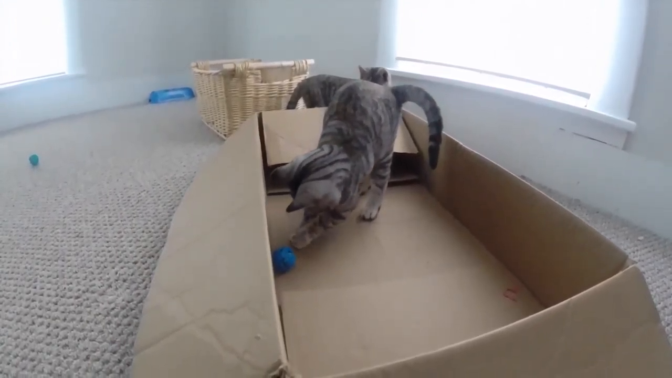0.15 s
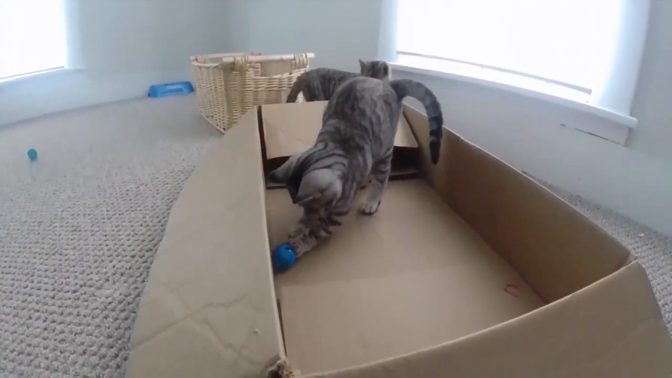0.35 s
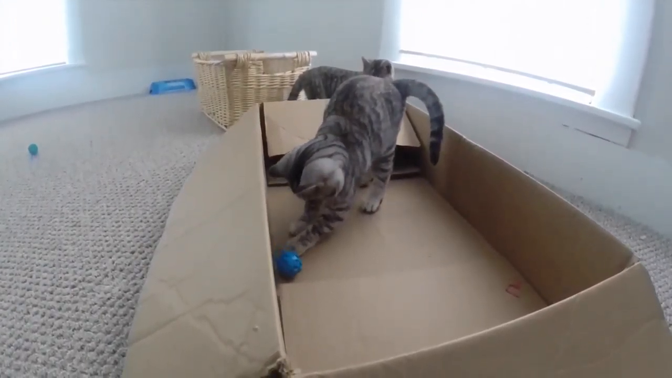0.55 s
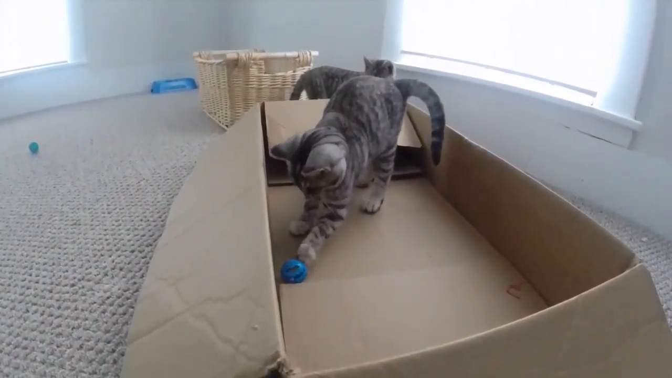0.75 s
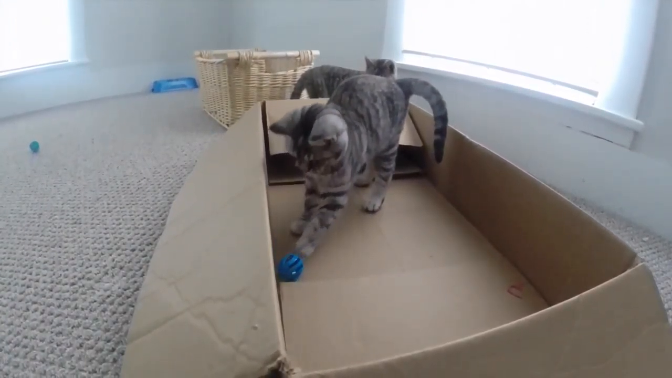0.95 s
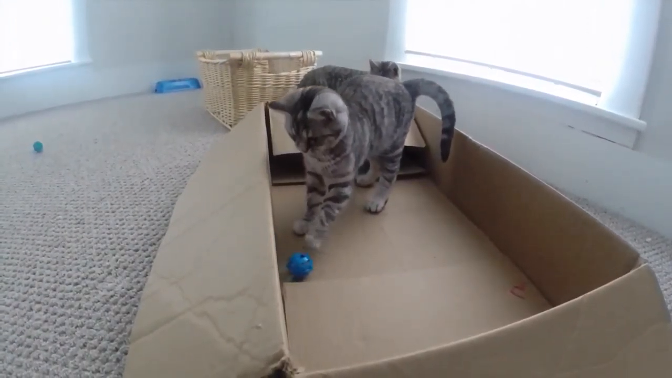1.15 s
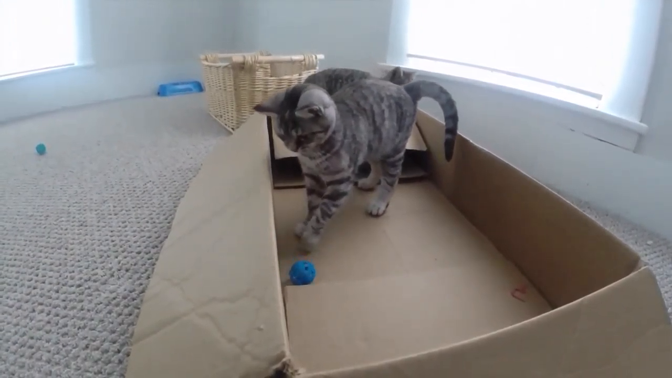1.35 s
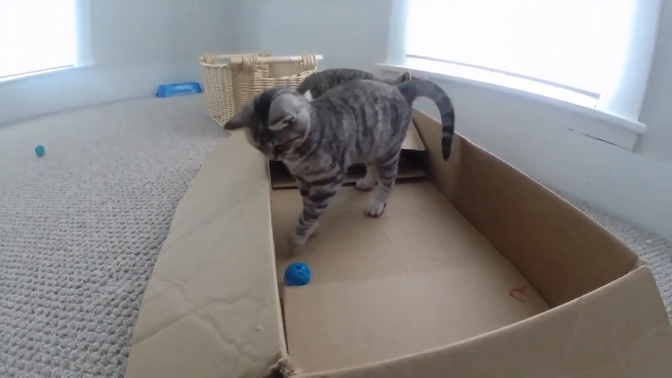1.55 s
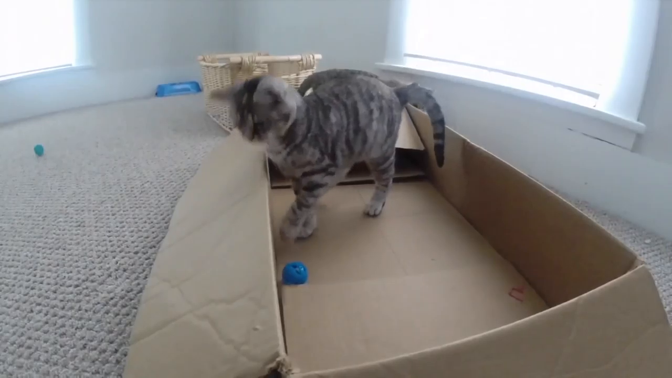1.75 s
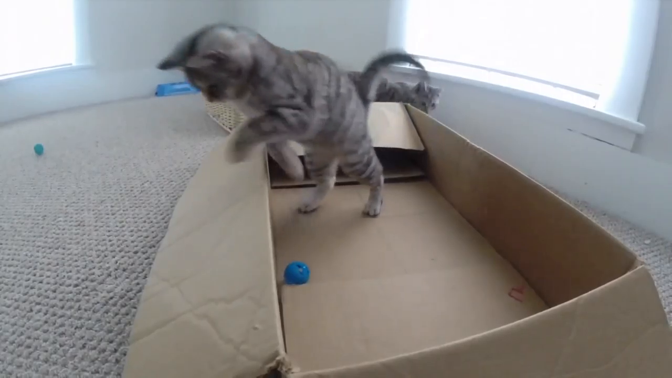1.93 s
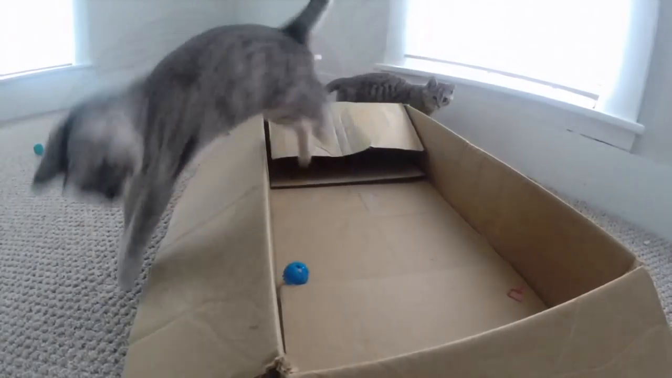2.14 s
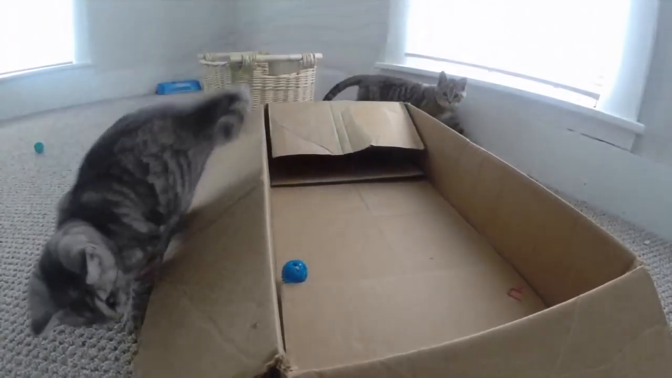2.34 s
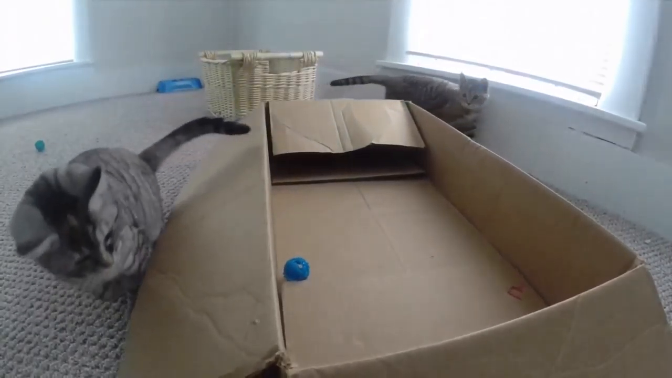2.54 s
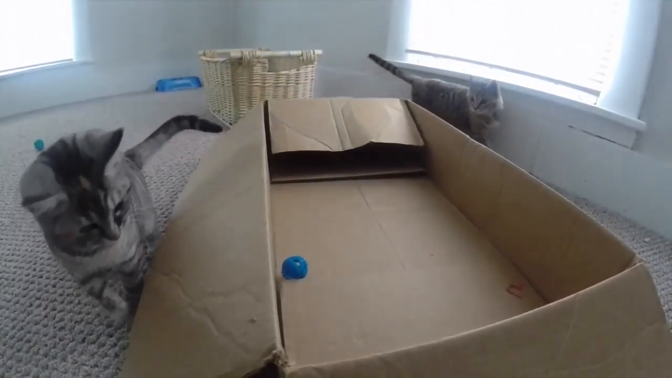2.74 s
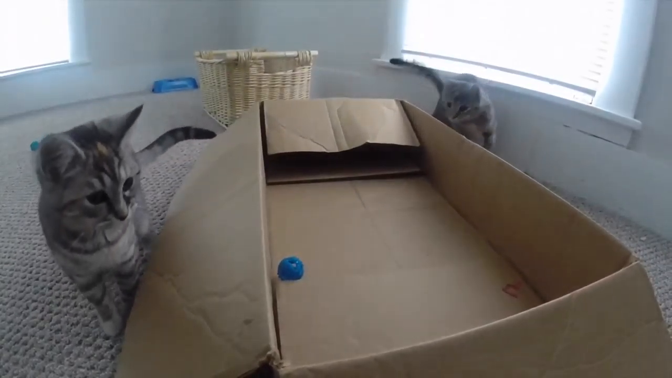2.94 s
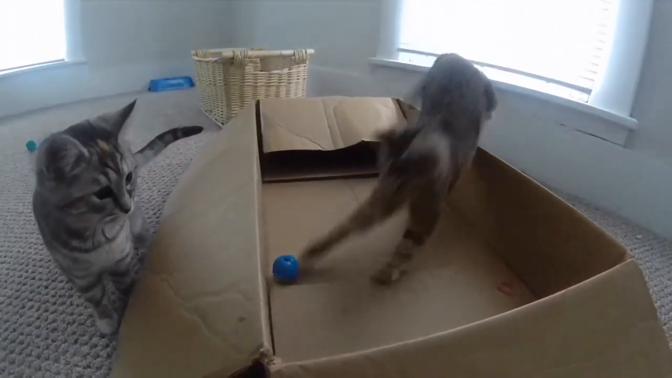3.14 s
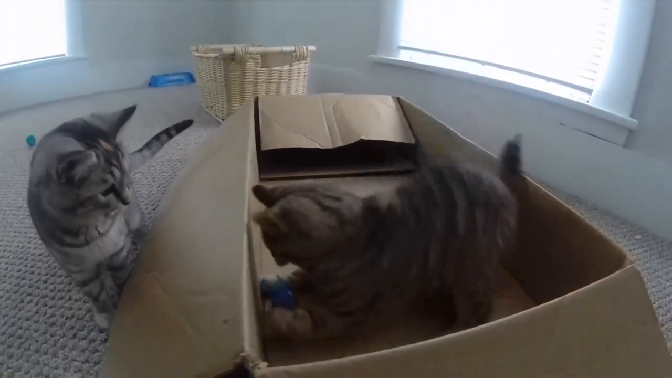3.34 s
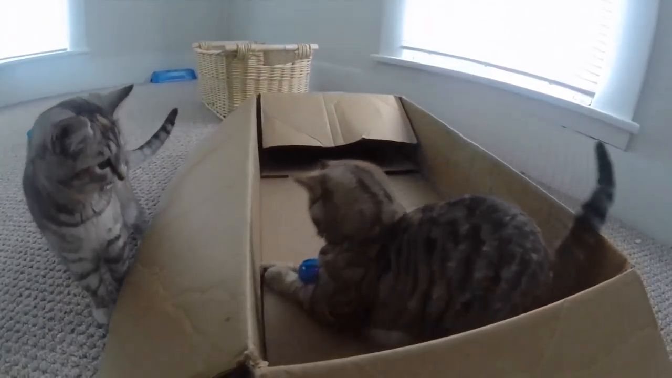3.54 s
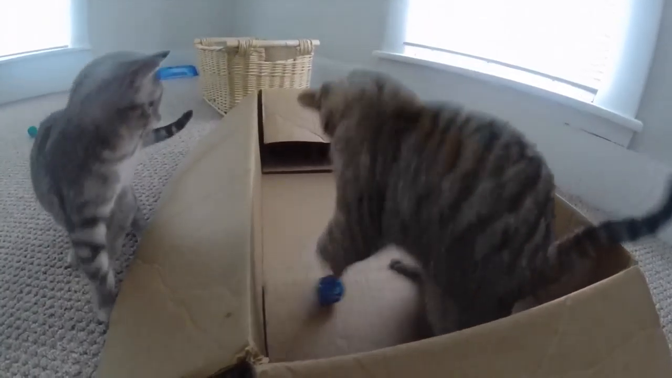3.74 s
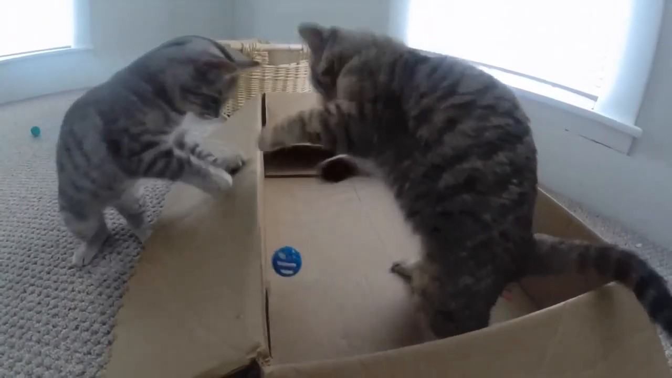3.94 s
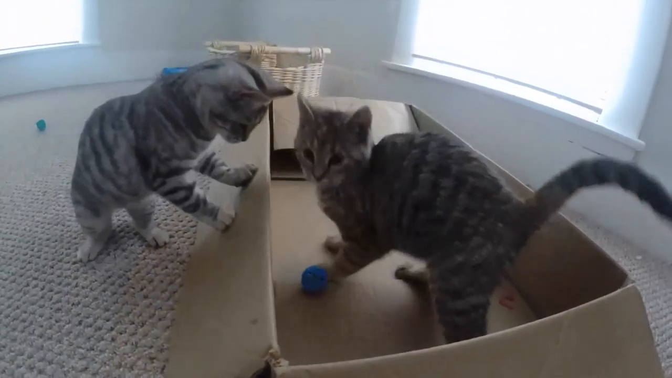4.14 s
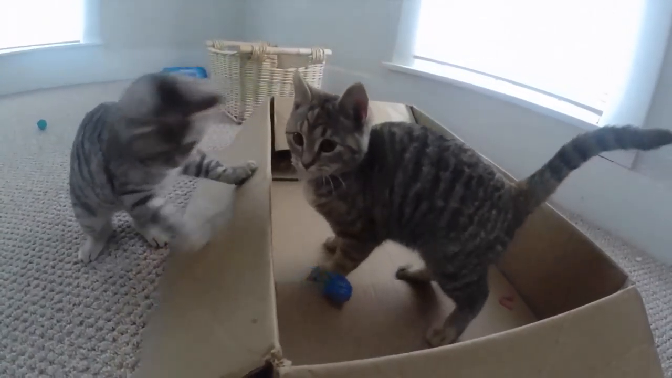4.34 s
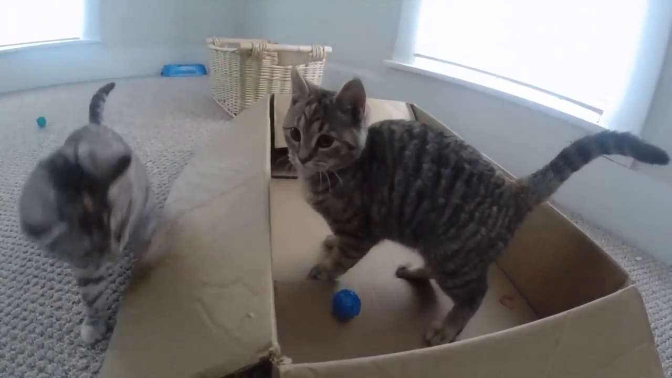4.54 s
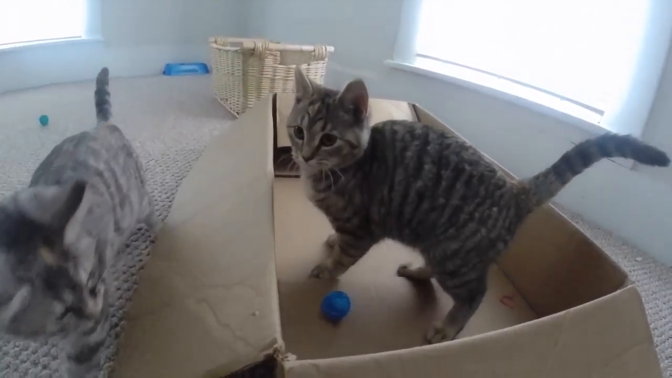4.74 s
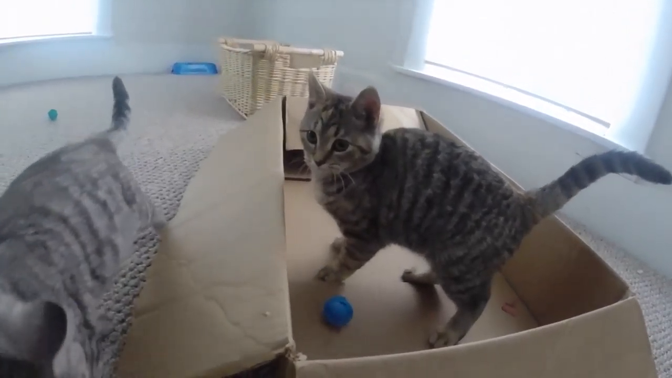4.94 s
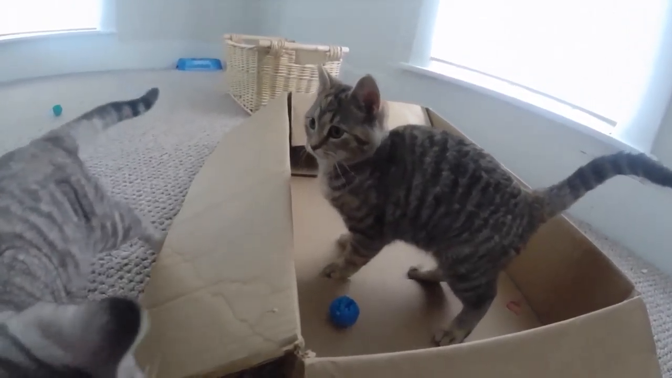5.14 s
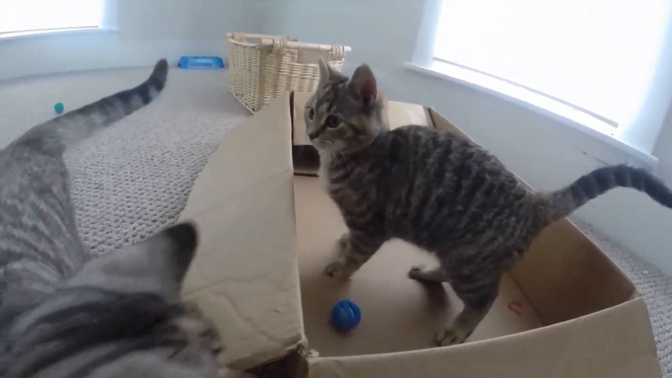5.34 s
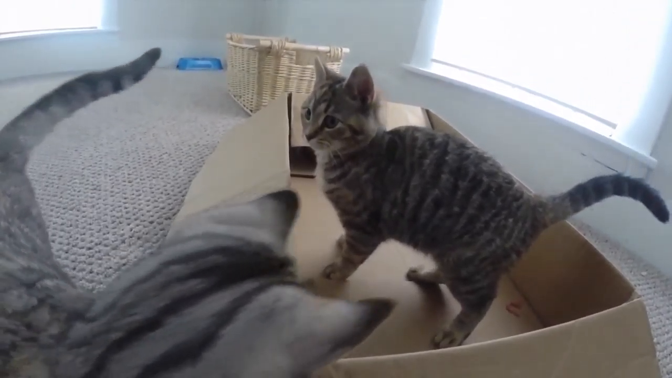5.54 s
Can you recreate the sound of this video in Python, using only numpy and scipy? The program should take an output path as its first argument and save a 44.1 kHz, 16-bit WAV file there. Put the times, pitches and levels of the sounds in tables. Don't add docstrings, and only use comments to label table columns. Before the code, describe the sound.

Light cardboard taps and faint bell tinkles, then a burst of hollow thumps, claw ticks and scrapes that settles into small clicks.

```python
import sys
import numpy as np
from scipy import signal
from scipy.fft import rfft, irfft, next_fast_len
from scipy.io import wavfile
from scipy.ndimage import uniform_filter1d, map_coordinates

SR = 44100
rng = np.random.default_rng(int(sys.argv[2]) if len(sys.argv) > 2 else 0)


def boost(x):
    u = np.asarray(x, float) / 20
    return 10 ** u


def master(y):
    cut = np.clip(np.atleast_2d(y).T, -1, 1)
    pcm = np.round(cut * 32767)
    wavfile.write(sys.argv[1], SR, pcm.astype(np.int16))


N = 250473


def unit(x):
    return x / np.sqrt(np.mean(x ** 2) + 1e-20)


def along(points, hz):
    f, v = np.transpose(points)
    return np.interp(np.log(hz + 1), np.log(f + 1), v)


def filtered(x, response):
    m = next_fast_len(len(x) + 8192)
    return irfft(rfft(x, m) * response(np.fft.rfftfreq(m, 1 / SR)), m)[:len(x)]


def resonances(modes):
    def response(f):
        total = 0
        for k, (centre, width, db) in enumerate(modes):
            damping = 1j * f * width
            total = total + (-1) ** k * boost(db) * damping / (centre * centre - f * f + damping)
        return total
    return response


def wobble(rate):
    at = np.arange(0, N + 32, 32)
    knots = rng.standard_normal(int(N * rate / SR) + 4)
    return np.interp(np.arange(N), at, map_coordinates(knots, [at * rate / SR]))


def ring(hz, db, t60, t, rise):
    return boost(db - 60 * t / t60) * np.sin(2 * np.pi * hz * t) * (1 - np.exp(-t / rise))


def burst(db, t60, t):
    fade = boost(-60 * t / t60)
    return boost(db) * unit(fade * rng.standard_normal(len(t))) * np.sqrt(np.mean(fade ** 2))


def add(track, s, sound):
    track[round(s * SR):][:len(sound)] += sound


# f/Hz, level/dB per Hz
AIR_SPECTRUM = [(15, -0.5), (35, -10), (65, 0), (91, -11), (300, -13.5), (2460, -26), (13500, -45.5),
                (15600, -60)]


def hush():
    noise = filtered(rng.standard_normal(N), lambda f: boost(along(AIR_SPECTRUM, f)))
    return boost(-57.5) * unit(noise)


def grit(per_s, spread_db, smooth):
    size = boost(spread_db * np.minimum(rng.exponential(size=N), 3)) * np.sign(rng.standard_normal(N))
    slips = (rng.random(N) < per_s / SR) * size
    return unit(unit(slips) + smooth * rng.standard_normal(N))


def patchy(x, spectrum, patchy_db):
    hz, _, z = signal.stft(x, SR, nperseg=256)
    field = uniform_filter1d(rng.standard_normal(z.shape), size=3, axis=0)
    field = uniform_filter1d(field, size=7, axis=1)
    gain = boost(along(spectrum, hz)[:, None] + patchy_db * unit(field))
    return unit(signal.istft(z * gain, SR, nperseg=256)[1][:N])


def strokes(rows, release_s, rest_db):
    attack_s, silent_db = 0.045, -100
    s, hold, db, over_db = np.transpose(rows)[:, :, None]
    t = np.arange(0, N / SR + .002, .001)
    gains = []
    for fall_s, extra_db, rest in zip(release_s, (0, over_db), rest_db):
        away = np.maximum(0, np.maximum((s - t) / attack_s, (t - s - hold) / fall_s))
        level = db - (db - silent_db) * away + extra_db
        gain = np.sqrt(np.sum(boost(level) ** 2, axis=0) + boost(rest) ** 2)
        gains.append(np.interp(np.arange(N) / SR, t, gain))
    return gains


# f/Hz, width/Hz, level/dB
PANEL_DRONE = [(126, 23, -0.5), (180, 52, -2.5), (250, 160, -8.5)]
PANEL_RATTLE = [(394, 23, -6), (510, 260, -4), (602, 270, -2.5), (697, 187, -8.5)]
# f/Hz, level/dB per Hz
PAD_SCRAPE = [(700, -3.5), (1000, 5.5), (2000, -0.5), (3300, -5.5), (4300, -15.5), (6000, -29)]
FUR_HISS = [(3000, -7), (4500, 1.5), (6000, -0.5), (8000, -6.5), (10000, -5.5), (13000, -14.5),
            (15400, -26)]
# t/s at full press, hold/s, drone level/dB, rattle level over drone/dB
WEIGHT_SHIFTS = [(.31, 0.2, -49.5, -9.5), (.485, 0.015, -43, -2.5), (.62, 0.37, -58.5, -11),
                 (.9, 0.021, -39, -2), (1.76, 0.48, -66, -5), (1.895, .01, -73, 7), (2.14, 0.013, -62, -15),
                 (2.28, 0.0046, -43.5, -10), (2.425, 0.0082, -42, -23), (3.222, 0.0067, -17, -35),
                 (3.32, 0.0088, -34.5, -1), (3.44, 0.029, -51, 14), (3.58, 0.06, -67.5, 18),
                 (3.7, 0.45, -56.5, 10), (3.985, 0.013, -32.5, 3.5), (4.09, 0.026, -39.5, 3),
                 (4.155, 0.0058, -30, -10), (4.3, 0.18, -57, -8), (4.56, 0.19, -58.5, -10),
                 (5.0, 0.091, -57, -18)]
# t/s at full speed, hold/s, scrape level/dB, fur hiss level over scrape/dB
PAD_SLIDES = [(.31, 0.056, -61.5, -16), (.365, 0.019, -56, -17), (.475, 0.043, -49.5, -16),
              (.62, 0.36, -67, -12), (.892, 0.008, -45.5, -37), (.915, 0.05, -59, -24),
              (1.73, .008, -76, 0), (1.888, 0.0095, -63, -4.5), (1.97, 0.006, -67.5, -5),
              (2.125, 0.018, -65, -3.5), (2.272, 0.0054, -61.5, -7), (2.41, 0.015, -66, -1),
              (3.222, 0.057, -42, -9), (3.26, 0.072, -38.5, -7.5), (3.36, 0.1, -44.5, -4.5),
              (3.44, 0.075, -42.5, -7), (3.55, 0.067, -49, -6.5), (3.635, 0.24, -50.5, -7.5),
              (3.865, 0.087, -47, -3), (3.965, 0.099, -48.5, -4), (4.098, 0.026, -38.5, -7.5),
              (4.165, 0.11, -54, -0.5), (4.28, 0.012, -50, -9), (4.345, 0.028, -58.5, 0),
              (4.495, 0.013, -61, 0), (4.56, 0.16, -65.5, -4), (4.99, 0.1, -68.5, -10)]
# level/dB of drone, rattle, scrape, fur
RESTLESS_DB = (-67, -84, -75, -79.5)


def scuffle():
    drone_gain, rattle_gain = strokes(WEIGHT_SHIFTS, release_s=(.32, .3), rest_db=RESTLESS_DB[:2])
    scrape_gain, fur_gain = strokes(PAD_SLIDES, release_s=(.33, .17), rest_db=RESTLESS_DB[2:])
    drone = filtered(grit(per_s=320, spread_db=19.0, smooth=3.7), resonances(PANEL_DRONE))
    drone = filtered(drone, resonances([(180, 155, 0)]))
    rattle = filtered(grit(per_s=330, spread_db=2, smooth=0.4), resonances(PANEL_RATTLE))
    rattle = filtered(rattle, resonances([(533, 1500, 0)]))
    scrape = patchy(grit(per_s=900, spread_db=4.5, smooth=.9), PAD_SCRAPE, patchy_db=1.8)
    fur = patchy(grit(per_s=800, spread_db=1.5, smooth=1.3), FUR_HISS, patchy_db=1.6)
    uneven = boost(1.2 * wobble(60))
    pressing = drone_gain * unit(drone) + rattle_gain * unit(rattle)
    return pressing + uneven * (scrape_gain * scrape + boost(2.5) * fur_gain * fur)


# t/s, f/Hz, peak level/dB, t60/s
PAD_LANDINGS = [(0.2955, 417, -58, 0.025), (0.713, 476, -36, 0.02), (2.2655, 160, -20, 0.036),
                (2.303, 152, -33, 0.043), (2.416, 548, -49, 0.15), (2.4462, 154, -34.5, 0.11),
                (2.49, 550, -48, .05), (2.9345, 330, -26.5, 0.029), (2.946, 230, -39, 0.044),
                (2.959, 305, -32.5, 0.024), (2.979, 220, -40, .04), (3.208, 424, -27, 0.036),
                (3.2425, 262, -17, 0.095), (3.2484, 194, -17.5, 0.077), (3.254, 543, -24, 0.022),
                (3.306, 382, -19.5, 0.051), (3.3535, 430, -22, 0.037), (3.356, 131, -17, 0.073),
                (3.411, 385, -8, 0.026), (3.4105, 218, -13, 0.12), (3.47, 199, -18, 0.072),
                (3.495, 212, -29, 0.034), (3.605, 483, -33.5, 0.026), (3.68, 484, -37.5, 0.037),
                (3.766, 200, -28, 0.05), (3.9558, 563, -8.5, 0.039), (3.9552, 272, -19.5, 0.1),
                (3.972, 554, -20.5, .09), (4.035, 250, -27, 0.13), (4.084, 172, -22, .05),
                (4.1, 568, -25.5, 0.091), (4.1475, 390, -17, 0.033), (4.1538, 237, -16, 0.043),
                (4.163, 123, -23.5, 0.1), (4.876, 300, -48, 0.028)]


def thumps():
    out, t = np.zeros(N + SR), np.arange(SR // 10) / SR
    for s, hz, db, t60 in PAD_LANDINGS:
        add(out, s, ring(hz, db + 1.5, t60, t, rise=0.32 / hz))
    return out[:N]


# f/Hz, level/dB, share of the blow's t60
BOARD_MODES = [(372, -16, 0.84), (405.3, -3.5, 0.88), (484.4, 5, 0.27), (591, -6, 0.57), (610, -13.5, 0.63),
               (676.4, -6.5, 0.71), (772, -3, 0.22), (995, -25.5, 1), (1546, 4, 0.069)]
# t/s, boom peak
# level/dB, boom f/Hz, knock level over boom/dB, struck spot's f/Hz
PANEL_BLOWS = [(0.297, -40, 191, 1.5, 415), (0.336, -42.5, 260, -4, 404), (0.376, -39, 173, -9, 594),
               (0.467, -37, 180, 3, 549), (0.568, -38.5, 203, -2.5, 443), (0.712, -57, 306, 22, 463),
               (0.8, -34, 150, 4, 460), (0.839, -40.5, 148, -1, 395), (0.885, -24, 186, 9.5, 526),
               (1.486, -48.5, 224, 6, 415), (1.883, -43, 156, 6, 550), (2.265, -34, 197, -1, 538),
               (2.299, -49, 144, -9, 355), (2.406, -33.5, 184, -10.5, 484),
               (2.419, -21, 148, -20.5, 533), (2.935, -44.5, 318, -1, 630),
               (2.963, -43.5, 250, 3, 355),
               (3.206, -24.5, 188, -2, 357), (3.218, -13, 179, -11, 353),
                       (3.243, -11.5, 183.4, 5, 510), (3.309, -23, 205, 6.5, 533),
                       (3.354, -25.5, 140, 13.5, 398), (3.381, -26.5, 191, 4.5, 488),
                       (3.407, -12, 192, 6, 416), (3.5, -26, 198, -3.5, 680),
                       (3.765, -28.5, 149.5, 3.5, 440), (3.797, -36, 176, 6.5, 477),
                       (3.85, -36, 233, 3, 587), (3.9556, -10.5, 188, 6.5, 379), (4.083, -39, 152, 7, 610),
                       (4.147, -46, 298, 23, 390), (4.153, -38, 237, 9.5, 377),
                       (4.256, -49, 203, 17.5, 526), (4.368, -38.5, 160, 4.5, 478),
                       (4.483, -47.5, 149, 10, 490), (4.581, -47, 214, 5.5, 525),
                       (4.624, -43, 225, 3.5, 407), (4.7, -50, 238, 11, 560), (4.876, -46, 191, -1, 456)]
# t/s, thud level/dB
FLOOR_THUDS = [(0.741, -41), (0.9, -52), (1.049, -41.5), (1.88, -38), (2.302, -26.5), (2.431, -23),
               (3.21, -28), (3.354, -26), (3.407, -60), (3.531, -35), (3.764, -31.5), (4.149, -16),
               (4.257, -34)]


def paws():
    panel, floor, t = np.zeros(N + SR), np.zeros(N + SR), np.arange(SR // 3) / SR
    for s, db, hz, over_db, spot_hz in PANEL_BLOWS:
        softness = min(over_db, 0)
        knock_db = db + over_db
        t60 = 0.086 * boost(-0.1 * softness)
        lasting = t60 * np.clip(2.05 + knock_db / 60, .4, 1.2)
        boom = ring(hz, db - 0.5, t60, t, 0.0005)
        boom += ring(hz * 1.34, db - 3 + 0.59 * softness, t60 * 1.06, t, 0.0027)
        boom += ring(hz * 0.774, db - 13.0, t60 * 1.3, t, 0.0051)
        add(panel, s, boom)
        for (f, level, share), (detune, luck) in zip(BOARD_MODES, rng.standard_normal((len(BOARD_MODES), 2))):
            mode_db = knock_db + level - 10.5 + 2 * luck
            add(panel, s, ring(f * (1 + 0.035 * detune), mode_db, lasting * share, t, 0.0006))
        add(panel, s, ring(spot_hz, knock_db, lasting * 0.34, t, 0.0022))
    for s, db in FLOOR_THUDS:
        add(floor, s, ring(62.0, db - 2.5, 0.15, t, 0.025) + ring(103.9, db - 11.0, 0.3, t, 0.018))
    high_pass = signal.butter(4, 130, "high", fs=SR, output="sos")
    return signal.sosfilt(high_pass, panel[:N]) + floor[:N]


# f/Hz, level/dB, t60/s
BELL_MODES = [
    [(4877, -1.5, .45)],
    [(4370, -.5, .4), (4477, -3, .3)],
    [(9470, 1, .35)],
    [(9706, -6, .17), (9860, -1, .15)],
    [(10553, -3, .25)],
]
# t/s, low
# pair level/dB, spot for the pair/degrees, overtones level/dB, spot for the overtones/degrees
PEA_STRIKES = [(0.312, -69, 9, -75, 170), (0.378, -51, 4, -85, 0), (0.468, -68, 4, -85, 0),
               (0.505, -55, 45, -65, 0), (0.527, -55, 40, -72, 50), (0.6, -61, 22, -84, 0),
               (0.69, -80, 30, -85, 0), (0.804, -64, 5, -77, 0), (0.836, -59, 30, -68, 35),
               (0.885, -66, 8, -71, 170), (0.927, -58, 25, -70, 0), (0.957, -60, 75, -59, 35),
               (0.968, -62, 50, -63, 145), (1.2, -68, 5, -90, 0), (4.407, -53, 38, -57, 85),
               (4.46, -67, 72, -80, 15), (4.573, -57, 5, -85, 0), (4.623, -58, 16, -68, 105),
               (4.649, -53, 24, -65, 80), (4.73, -62, 30, -76, 110), (4.935, -69, 4, -85, 0),
               (4.958, -60, 4, -88, 0), (4.995, -60, 4, -85, 10), (5.034, -69, 20, -85, 0),
               (5.074, -68, 5, -58, 8), (5.085, -76, 15, -65, 148),
               (3.244, -42, 20, -42, 120), (3.278, -42, 66, -45, 105), (3.327, -52, 51, -67, 60),
                  (3.39, -48, 22, -63, 42), (3.5, -48, 14, -58, 50), (3.533, -54, 3, -55, 112),
                  (3.578, -53, 10, -52, 108), (3.636, -54, 30, -71, 120), (3.694, -52, 30, -71, 120),
                  (3.794, -50, 48, -52, 90), (3.83, -48, 25, -58, 45), (3.865, -38, 24, -46, 102),
                  (3.9, -39, 27, -51, 130), (3.935, -41, 27, -53, 155), (3.956, -33, 12, -52, 123),
                  (4.004, -44, 20, -56, 100), (4.065, -82, 45, -85, 0), (4.092, -31, 7, -59, 10),
                  (4.124, -41, 75, -62, 165), (4.156, -41, 8, -62, 140), (4.19, -45, 35, -60, 140),
                  (4.221, -46, 36, -50, 85), (4.234, -47, 30, -51, 25), (4.27, -56, 80, -71, 60),
                  (4.297, -54, 45, -70, 65)]


def bell():
    t, out = np.arange(N) / SR, np.zeros(N)
    s, low_db, spot, high_db, high_spot = np.transpose(sorted(PEA_STRIKES))
    pair = [boost(low_db) * np.cos(np.radians(spot - 90 * k)) for k in range(2)]
    overtones = [boost(high_db) * np.cos(np.radians(high_spot - 60 * k)) ** 2 for k in range(3)]
    last = np.maximum(np.searchsorted(s, t) - 1, 0)
    age = t - s[last]
    for strength, group in zip(pair + overtones, BELL_MODES):
        for hz, db, t60 in group:
            luck = rng.random((len(s), 2))
            share_db = 6 * (len(group) - 1) * (luck[last, 0] - .5)
            size = (age > 0) * strength[last] * boost(db + share_db - 60 * np.abs(age) / t60)
            size = size * boost(2.2 * wobble(60))
            phase = np.cumsum(luck[:, 1])[last] + .8 * np.sqrt(hz / 4877) * wobble(45)
            swing = uniform_filter1d(size * [np.cos(phase), np.sin(phase)], size=120)
            out += swing[0] * np.sin(2 * np.pi * hz * t) + swing[1] * np.cos(2 * np.pi * hz * t)
    return out


# f/Hz, width/Hz, level/dB
BOARD_SKIN = [(980, 180, 2.5), (1520, 256, 7), (2130, 2100, 3.5), (3800, 2540, -2)]
# t/s, rap peak level/dB, tick peak
# level/dB
BOARD_CONTACTS = [(0.377, -47, -51), (0.489, -33.5, -66), (0.508, -36.5, -50), (0.5275, -55, -45),
                  (0.836, -44, -54), (0.8849, -26.5, -57), (1.002, -49, -66), (1.883, -45, -60),
                  (2.2662, -55, -53), (2.2768, -52, -46), (2.417, -53, -52),
                  (3.209, -31.5, -42), (3.218, -50, -31), (3.244, -14.5, -29), (3.3265, -44, -39),
                       (3.391, -42, -31.5), (3.406, -18.5, -38.5), (3.496, -61, -39), (3.576, -42, -78),
                       (3.601, -47, -46), (3.767, -25.5, -45), (3.7858, -28, -35), (3.7941, -31, -28.5),
                       (3.8502, -29.5, -51), (3.863, -48, -58), (3.87, -63, -36), (3.9231, -41, -31),
                       (3.9556, -12.5, -31.5), (3.96, -29, -23.5), (4.005, -31, -32), (4.084, -20.5, -24),
                       (4.123, -40, -42.5), (4.212, -39.5, -62), (4.2556, -44, -62.5), (4.301, -83, -46),
                       (4.4122, -39.5, -54), (4.483, -65, -63), (4.5702, -44, -42.5), (4.622, -47, -58.5),
                       (4.6998, -46.5, -56), (5.032, -53, -59)]
# t/s, peak level/dB
CLAW_SNAPS = [(3.2522, -41.5), (3.4218, -45), (3.4942, -30.5), (3.612, -52.5), (3.8693, -31.5),
              (3.9222, -39.5), (4.0035, -49.5), (4.0389, -41), (4.0679, -44.5), (4.0823, -43.5),
              (4.1222, -45), (4.22, -52.5), (4.232, -53.5)]


def claws():
    rap, tick, sizzle = np.zeros((3, N + SR))
    t = np.arange(SR // 20) / SR
    for s, rap_db, tick_db in BOARD_CONTACTS:
        add(rap, s, burst(rap_db + 6.5, 0.01, t))
        add(tick, s, burst(tick_db + 6.5, 0.004, t))
        add(sizzle, s, burst(tick_db - 15, .006, t))
    for s, db in CLAW_SNAPS:
        add(sizzle, s, burst(db + 2.5, 0.0082, t))

    def band(x, lo_hz, hi_hz):
        return signal.sosfilt(signal.butter(2, [lo_hz, hi_hz], "band", fs=SR, output="sos"), x[:N])
    return filtered(rap[:N], resonances(BOARD_SKIN)) + band(tick, 4500, 9000) + band(sizzle, 10500, 14200)


# t/s, f/Hz, peak level/dB, t60/s
NOTE_CLICKS = [(0.801, 2430, -38.5, 0.0094), (0.836, 1370, -38, 0.013), (0.923, 2260, -34, 0.012),
               (1.0017, 2350, -41, 0.016), (1.972, 1900, -44, 0.011), (2.145, 3080, -49, 0.011),
               (0.8852, 686.4, -31, 0.16), (3.268, 7100, -25, .005), (3.282, 3800, -24, .006),
               (3.391, 5500, -33, .005), (3.4085, 629, -6, 0.025), (3.409, 1520, -9, 0.013),
               (3.7938, 4980, -14.5, 0.0046), (3.863, 5800, -35, .006), (3.87, 5600, -38, .007),
               (3.9235, 6000, -36, .007), (3.9558, 513, -21, 0.04), (4.083, 765, -17, 0.023),
               (4.106, 5600, -24, .005), (4.005, 6000, -31, .007), (4.084, 2740, -12, 0.0045),
               (4.084, 3850, -10, 0.0033), (4.2117, 4840, -24.5, 0.0042), (4.2567, 1800, -34, 0.014),
               (4.279, 1710, -30.5, 0.01), (4.283, 1900, -37, 0.02), (4.294, 3250, -37, 0.029),
               (4.446, 1250, -49, .02), (4.4833, 1790, -38.5, 0.024), (4.4823, 2620, -40.5, 0.015),
               (4.495, 1810, -35.5, 0.02), (3.955, 1500, -19, 0.018), (4.549, 1170, -50, 0.014),
               (4.549, 3700, -48, .006), (4.5698, 1170, -45, 0.032), (4.6234, 1250, -40.5, 0.021),
               (4.624, 3300, -38.5, 0.007), (4.6234, 6200, -46, .006), (4.6487, 1190, -42, 0.016),
               (4.6715, 1160, -53, 0.02), (4.6842, 1880, -47, 0.017), (4.7008, 1150, -42, 0.015),
               (4.714, 4040, -38, 0.0048), (4.959, 1200, -48.5, 0.032), (5.032, 4630, -49, 0.0087),
               (5.065, 1760, -53.5, 0.039), (5.1, 3550, -53, 0.017)]


def clicks():
    out, t = np.zeros(N + SR), np.arange(SR // 10) / SR
    for (s, hz, db, t60), luck in zip(NOTE_CLICKS, rng.standard_normal(len(NOTE_CLICKS))):
        note = ring(hz, db, t60, t, 0.00034)
        neighbour = ring(hz * (1.18 + 0.082 * luck), db - 20.5, t60 * 2.5, t, .0002)
        add(out, s, note + neighbour)
    return out[:N]


# start t/s, length/s, f/Hz, level/dB
SINGING_SLIDES = [(3.564, 0.14, 2060, -48), (3.569, 0.11, 3900, -55), (3.6, 0.036, 498, -44),
                  (3.655, 0.21, 1960, -51.5), (3.672, 0.15, 470, -55), (3.867, 0.061, 3750, -49.5),
                  (3.863, 0.1, 960, -51), (3.87, 0.096, 1850, -50.5), (3.876, 0.096, 2860, -49.5),
                  (3.441, 0.031, 1780, -42), (3.868, 0.067, 5900, -58), (3.968, 0.079, 3700, -52),
                  (4.007, .12, 6560, -53.5), (4.138, 0.069, 1890, -52), (4.251, 0.051, 510, -52),
                  (4.288, 0.034, 517, -48.5), (4.268, 0.035, 1790, -41.5), (4.271, 0.031, 3280, -52),
                  (4.275, 0.032, 2550, -50), (4.925, 0.067, 1220, -64), (3.538, 0.12, 1283, -54),
                  (3.889, 0.12, 1650, -46), (3.6, 0.03, 1840, -50), ]


def drags():
    out = np.zeros(N)
    for start, length, hz, db in SINGING_SLIDES:
        rub = rng.standard_normal(round(length * SR))
        narrow = resonances([(hz, 70 + .1 * hz, 0)])
        song = unit(filtered(rub, lambda f: narrow(f) ** 2))
        song = unit(song / np.sqrt(np.abs(signal.hilbert(song)) + .2))
        add(out, start, boost(db) * signal.windows.tukey(len(rub), .4) * song)
    return out


# f/Hz, t60/s
ROOM_DECAY = [(100, 0.42), (500, 0.2), (2000, 0.27), (8000, 0.096)]


def room(x):
    hz, t, z = signal.stft(rng.standard_normal(SR // 2), SR, nperseg=256)
    tail = signal.istft(z * boost(-60 * t / along(ROOM_DECAY, hz)[:, None]), SR, nperseg=256)[1]
    delayed = np.pad(x, (150, 0))
    return signal.fftconvolve(delayed, tail / np.linalg.norm(tail))[:N]


def scene():
    blows, pads, contacts, jingle = paws(), thumps(), claws() + clicks(), bell()
    echo = room(boost(-6.5) * blows + boost(-9.5) * contacts + boost(-54) * jingle + boost(-17.5) * pads)
    return (blows + pads + contacts + jingle + echo + scuffle() + drags() + hush())[None]


def low_pass(x):
    return signal.sosfilt(signal.butter(12, 16300, fs=SR, output="sos"), x)


def record(dry):
    mix = filtered(dry[0], lambda f: (f < 15810) * boost(-12 * (f > 15250)))[None]
    return low_pass(mix)


dry = scene()
out = record(dry)
master(out)
```